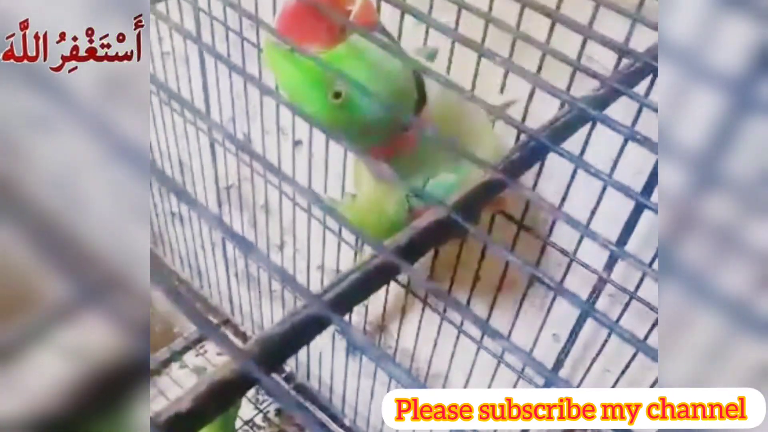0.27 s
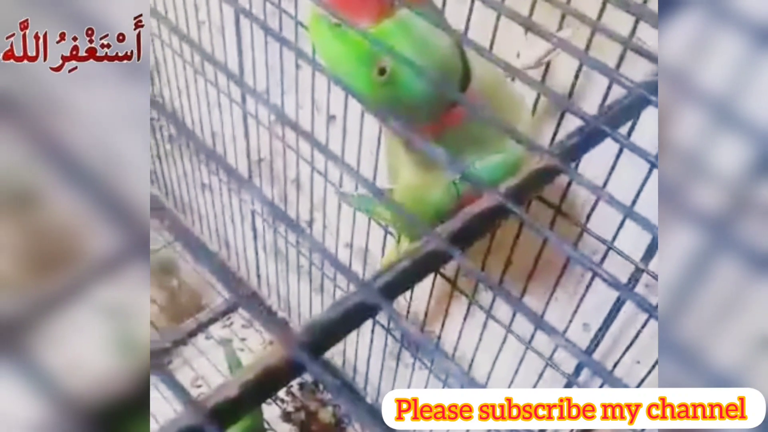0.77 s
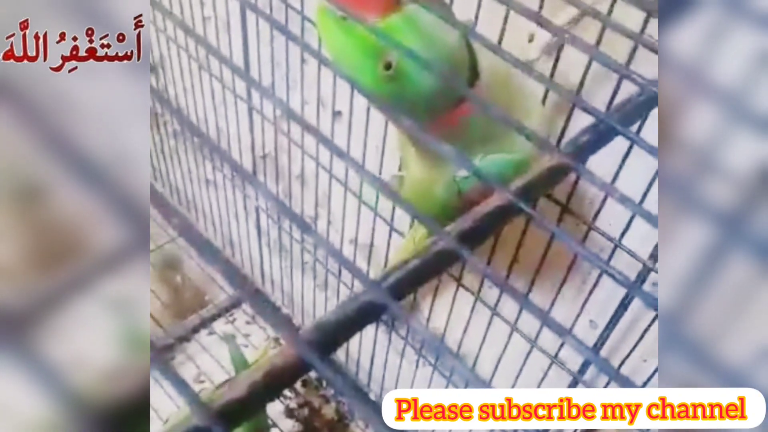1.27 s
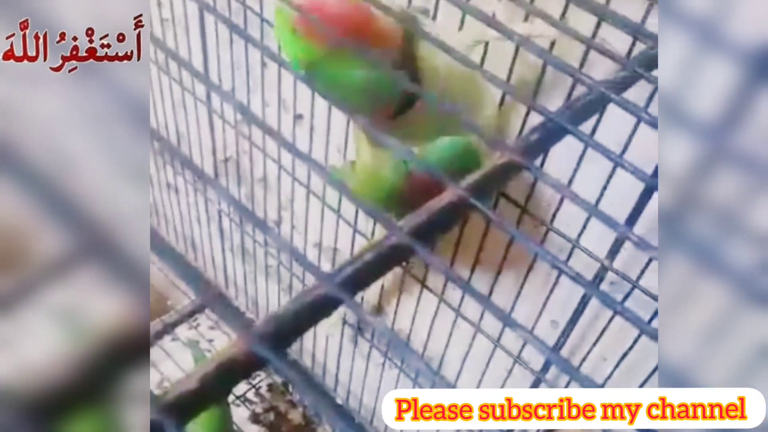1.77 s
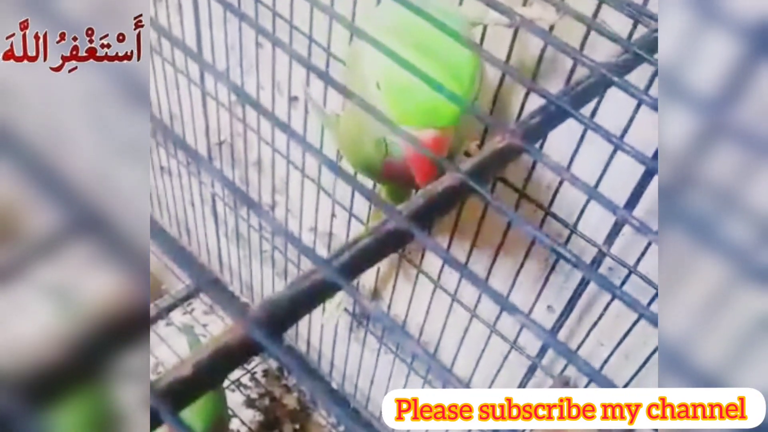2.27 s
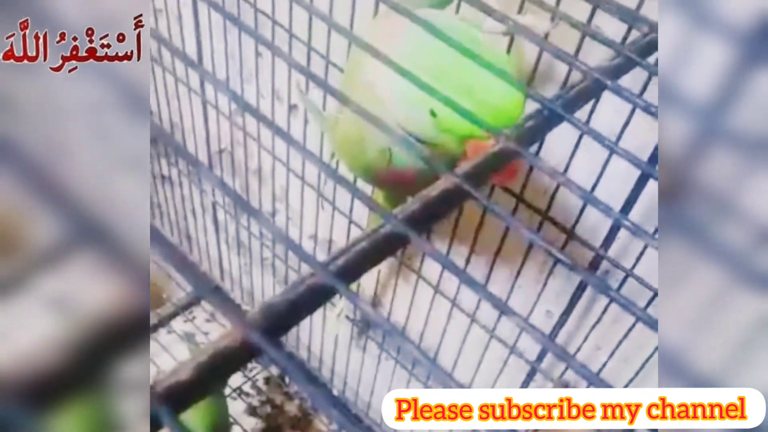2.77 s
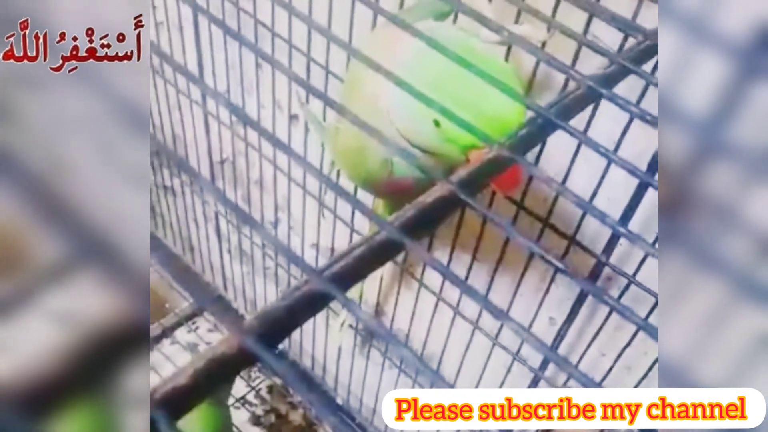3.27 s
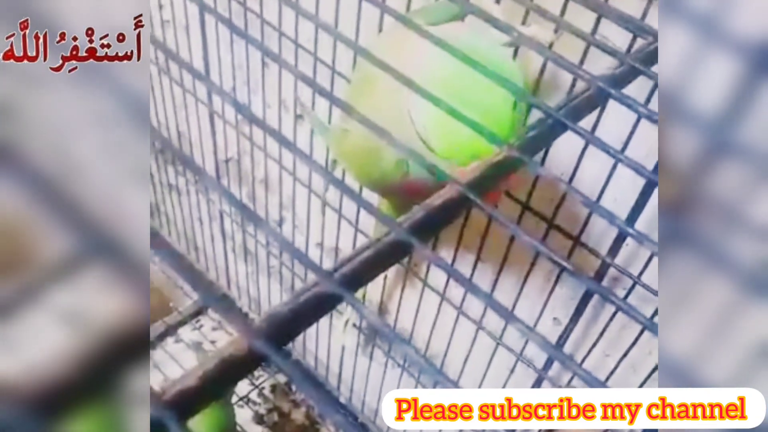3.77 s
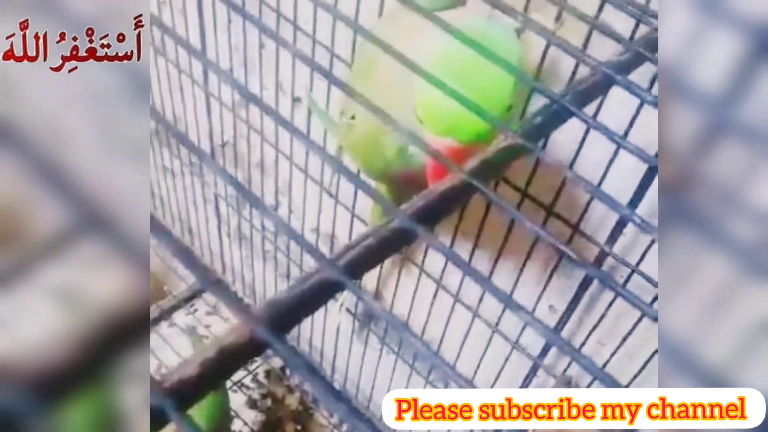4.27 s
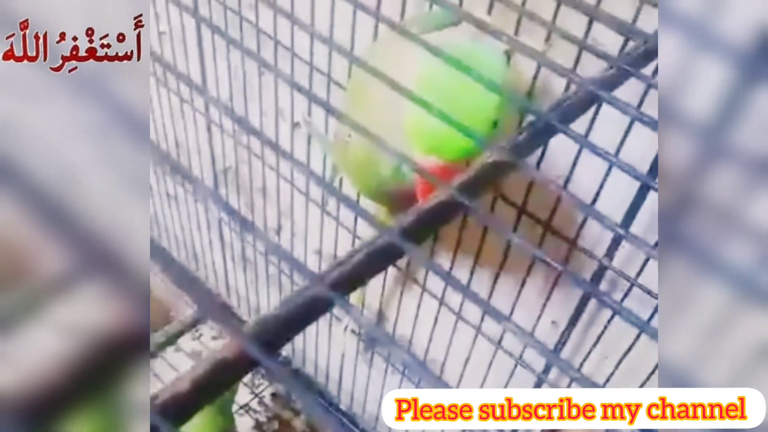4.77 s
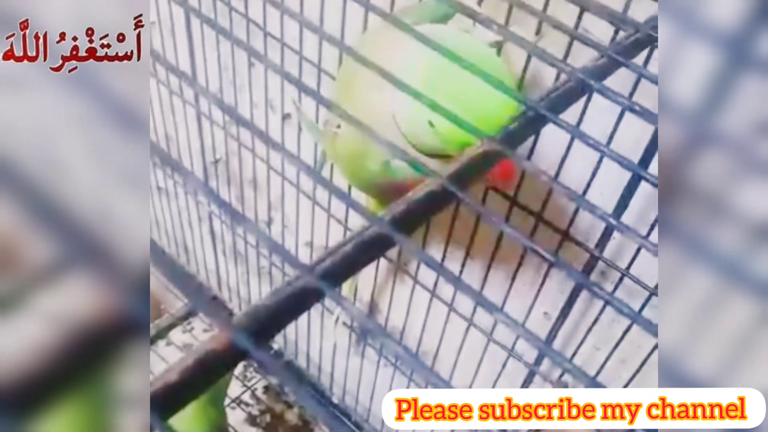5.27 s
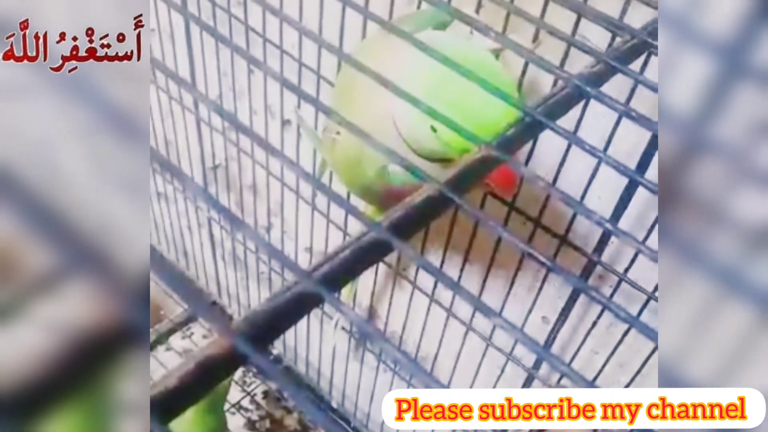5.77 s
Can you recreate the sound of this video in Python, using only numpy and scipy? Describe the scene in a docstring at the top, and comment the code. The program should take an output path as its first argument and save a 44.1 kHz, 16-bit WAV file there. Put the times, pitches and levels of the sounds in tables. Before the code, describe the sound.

In a hard, echoing room with a faint machine hum, a caged parakeet is heard close up in stereo. Quiet gritty chirps, sharp clicks and feathers brushing wire lead to a high falling whistle and a short-long pair of buzzy squawks, while something calls hoarsely farther off. After a pause come three piercing, nearly pure whistles with a wing shake, then more chirps and another squawk pair.

```python
"""A parakeet in a wire cage, close to a phone's two microphones in a hard, echoing room.
Soft chips lead up to arched whistles, nearly pure tones, and to two pairs of rasping squawks,
pulses ringing in its throat. Its feathers scrape the cage, a wing stirs the air, and a few sharp
dry clicks sound close by. A hoarse call comes from farther off, over a low machine hum.
The phone's gain control ducks the room under each loud note."""
import sys
import numpy as np
from scipy import signal
from scipy.fft import rfft, irfft, next_fast_len
from scipy.io import wavfile
from scipy.ndimage import uniform_filter1d, minimum_filter1d, map_coordinates

SR = 44100
rng = np.random.default_rng(int(sys.argv[2]) if len(sys.argv) > 2 else 0)


def file_out(sig):
    """Save sig as 16-bit WAV at sys.argv[1]."""
    # one column per channel
    cols = np.atleast_2d(sig).T
    # limit, then scale
    lim = np.clip(cols, -1, 1)
    pcm = np.round(lim * 32767).astype(np.int16)
    wavfile.write(sys.argv[1], SR, pcm)


N = 265878
TOP_HZ = 13200  # upper limit of the phone's band


def amp(db):
    """Decibels to gain."""
    return 10 ** (np.asarray(db) / 20)


def unit(x):
    """Scale to rms 1."""
    return x / np.sqrt(np.mean(x ** 2) + 1e-20)


def along(points, hz):
    """Read (f/Hz, value) points on a log frequency axis."""
    f, v = np.transpose(points)
    return np.interp(np.log(hz + 1), np.log(f), v)


def wobble(rate, size):
    """A smooth random curve, rate knots a second."""
    knots = rng.standard_normal(int(size * rate / SR) + 4)
    return map_coordinates(knots, [np.arange(size) * rate / SR])


def filtered(x, response):
    """Filter x by a function of frequency."""
    size = x.shape[-1]
    m = next_fast_len(size + 8192)
    return irfft(rfft(x, m) * response(np.fft.rfftfreq(m, 1 / SR)), m)[..., :size]


def noise(colour, size):
    """Noise of rms 1 with a (f/Hz, level/dB) spectrum."""
    return unit(filtered(rng.standard_normal(size), lambda hz: amp(along(colour, hz))))


def ringing(x, colour):
    """x through a (f/Hz, level/dB) body that rings only after it is struck: minimum phase."""
    m = next_fast_len(len(x) + 2048)
    cepstrum = irfft(np.log(amp(along(colour, np.fft.rfftfreq(m, 1 / SR)))), m)
    cepstrum[1:m // 2] *= 2
    cepstrum[m // 2 + 1:] = 0
    return irfft(rfft(x, m) * np.exp(rfft(cepstrum)), m)[:len(x)]


def gesture(points, glide_s):
    """Start time and a curve through (t/s, value) points, its corners rounded."""
    times, values = np.transpose(points)
    curve = np.interp(np.arange(times[0], times[-1], 1 / SR), times, values)
    size = int(glide_s * SR)
    padded = np.pad(curve, size, "reflect", reflect_type="odd")
    return times[0], uniform_filter1d(padded, size)[size:-size]


def add(track, s, sound):
    """Mix a sound into the track at time s."""
    start = max(0, round(s * SR))
    track[start:start + len(sound)] += sound[:N - start]


def faded(x, edge_s):
    """Soften both ends."""
    return x * signal.windows.tukey(len(x), min(1, 2 * edge_s * SR / len(x)))


def phase_of(hz):
    """Running phase of a moving frequency."""
    return 2 * np.pi * np.cumsum(hz) / SR


def from_top(t, rise, fall):
    """Distance from the top of an arch: 1 at its start, 0 at the top, 1 at its end."""
    return np.clip(np.maximum((rise - t) / rise, (t - rise) / fall), 0, 1)


# room tone all around the phone: f/Hz, relative level/dB
ROOM_TONE = [(15, -41.5), (25, -9.5), (86, -7), (170, -18), (433, -22.5), (1110, -30.5), (9000, -40),
             (13000, -51.5)]
# its likeness at the two microphones: f/Hz, correlation
MIC_LIKENESS = [(60, 0.96), (150, 1), (400, 0.13), (1500, 0.045)]


def room_tone(level_db=-56):
    """The room's own noise: alike at both microphones in the bass, wide in the treble."""
    def mid_side_gains(hz):
        """Share the power between mid and side to set the correlation."""
        angle = np.arccos(along(MIC_LIKENESS, hz)) / 2
        return np.array([np.cos(angle), np.sin(angle)])
    mid, side = filtered(np.array([noise(ROOM_TONE, N), noise(ROOM_TONE, N)]), mid_side_gains)
    return amp(level_db) * np.array([mid + side, mid - side])


# partials of a machine in the background: f/Hz, level/dB before the swell
HUM_PARTIALS = [(73.5, -58.5), (96.9, -63.5), (145.3, -67.5), (193.8, -72)]
# its early swell: t/s, gain/dB
HUM_SWELL = [(0, 1), (1.3, 2), (1.7, -1.5)]


def machine_hum(waver_db=0.48, waver_hz=2.4):
    """A low, unsteady hum, the same at both microphones."""
    hum = np.zeros(N)
    for hz, db in HUM_PARTIALS:
        gain = amp(db + waver_db * wobble(2.4, N))
        hum += gain * unit(np.sin(phase_of(hz + waver_hz * wobble(19, N))))
    return amp(np.interp(np.arange(N) / SR, *np.transpose(HUM_SWELL))) * hum


# decay of the hard room: f/Hz, t60/s
ROOM_DECAY = [(400, 1), (1000, 1), (2800, 0.76), (6000, 0.65), (12000, 0.39)]
# colour of its echoes: f/Hz, gain/dB
ECHO_COLOUR = [(400, -2.5), (800, -1.5), (1600, -2.5), (2500, -0.5), (5500, -4), (12000, -4)]


def room(x, early_db, tail_db, count=24, build_s=0.035):
    """Early echoes from the floor and near walls, then a long diffuse tail."""
    hz, t, spectrum = signal.stft(rng.standard_normal((2, SR)), SR, nperseg=256)
    decay = amp(-60 * t / along(ROOM_DECAY, hz)[:, None])
    tail = signal.istft(spectrum * decay, SR, nperseg=256)[1]
    tail *= 1 - np.exp(-np.arange(tail.shape[1]) / SR / build_s)
    response = amp(tail_db) * tail / np.linalg.norm(tail[0])
    for channel in response:
        arrivals = (rng.uniform(0.0018, 0.024, count) * SR).astype(int)
        channel[arrivals] += amp(early_db) * rng.choice([-1, 1], count) / np.sqrt(count)
    echoes = signal.fftconvolve(x[None], response, axes=1)[:, :N]
    return filtered(echoes, lambda hz: amp(along(ECHO_COLOUR, hz)))


# husk of the call from farther off: t/s, relative level/dB
HUSK_LEVEL = [(1.6, -59.5), (1.746, -42.5), (1.86, -39.5), (1.956, -52.5), (2.152, -43), (2.42, -37.5),
              (2.555, -40.5)]
# its colour at the phone: f/Hz, relative level/dB
HUSK_COLOUR = [(400, -24), (620, 3), (860, -1), (1100, 12.5), (1350, 6), (1700, 11.5), (2300, 2.5),
               (2700, -3), (4000, -12.5), (7000, -9.5), (13000, -36)]


def hoarse_call(husk_gain_db=4, flutter_db=2, tone_at_s=2.01, tone_s=.52, tone_db=-40.5, swell_db=7):
    """A far, husky cry with one rough, rising tone in it; it arrives differently at each microphone."""
    out = np.zeros((2, N))
    s, db = gesture(HUSK_LEVEL, glide_s=0.029)
    t = np.arange(0, tone_s, 1 / SR)
    progress = t / t[-1]
    hz = 676.6 + 86 * t
    jitter = .012 + .045 * progress
    tone_gain = amp(tone_db + swell_db * (progress - .5))
    for channel in out:
        husk = amp(husk_gain_db + db + flutter_db * wobble(50, len(db))) * noise(HUSK_COLOUR, len(db))
        phase = phase_of(hz * (1 + jitter * wobble(150, len(t))))
        tone = unit(np.sin(phase) * amp(2.5 * wobble(90, len(t))))
        add(channel, s, faded(husk, edge_s=0.0036))
        add(channel, tone_at_s, faded(tone_gain * tone, edge_s=0.016))
    return out


def cage_scatter(x, db, count):
    """The cage bars and floor send back many weak copies within a few milliseconds."""
    response = np.zeros((2, SR // 50))
    for channel in response:
        arrivals = (rng.uniform(.0003, .006, count) * SR).astype(int)
        channel[arrivals] = amp(db) * rng.choice([-1, 1], count) / np.sqrt(count)
    return signal.fftconvolve(x[None], response, axes=1)[:, :N]


# the bird at close range, left microphone over right: f/Hz, level/dB
NEAR_BALANCE = [(1500, -2), (2700, 7.5), (5000, -4), (5600, 0), (6200, 9.5), (7200, -3), (8500, 13),
                (9500, -6), (11200, -24), (13000, -12.5)]
# the left microphone's lead: f/Hz, phase/rad
NEAR_LEAD = [(200, .1), (900, 2.7), (2300, 1.9), (3900, 1.9), (4500, 6.2), (5500, 4.9), (6700, 7.5),
             (7600, 7.26), (9000, 11), (12500, 10.6)]
# left over right as the bird squawks, head down at the rail: f/Hz, level/dB
HEAD_DOWN_BALANCE = [(420, 2), (1600, -5.5), (2400, 5.5), (3100, 0.5), (5800, -3), (8000, 4), (11500, -15)]
# the left microphone's lead from there: f/Hz, phase/rad
HEAD_DOWN_LEAD = [(500, 0.61), (2800, 2.74), (3600, 3.88), (4600, 5.47), (5600, 5.9), (7000, 7.5),
                  (8000, 11)]


def microphones(x, balance, lead):
    """The phone's body shades and delays the direct sound differently for its two microphones."""
    def response(hz):
        """Left and right gain and phase, at constant total power."""
        sides = np.array([[.5], [-.5]])
        shade = amp(sides * along(balance, hz))
        return shade / np.sqrt(np.mean(shade ** 2, axis=0)) * np.exp(1j * sides * along(lead, hz))
    return filtered(x, response)


# a wing shaken near the phone: peak t/s, level/dB, fade/s
WING_FLAPS = [(4.288, -42, .12)]
# the air it moves: f/Hz, relative level/dB
WING_COLOUR = [(60, -36), (140, -0.5), (2200, -8.5), (4000, -48)]


def wing_flap(lumps_db=3, rise_share=0.42):
    """A soft lumpy rush of air from a shaken wing, quicker to grow than to fade."""
    out = np.zeros(N)
    for s, db, fade in WING_FLAPS:
        rise = rise_share * fade
        t = np.arange(-rise, fade, 1 / SR)
        swell = np.cos(np.pi / 2 * t / np.where(t < 0, rise, fade))
        lumps = amp(db + lumps_db * wobble(83, len(t)))
        add(out, s + t[0], swell * lumps * noise(WING_COLOUR, len(t)))
    return out


# feather strokes on the cage: peak t/s, relative level/dB, fade/s, tilt/(dB per octave), wire ring/dB
FEATHER_STROKES = [(0.016, -48, 0.027, -0.5, -6), (0.158, -38, 0.039, 3.5, 7.5),
                   (0.478, -35, 0.035, 1.5, 4.5), (1.038, -41, 0.066, 1, -2), (1.157, -44.5, 0.045, 4, -3),
                   (1.344, -37.5, 0.054, 7.5, 4), (4.232, -22.5, 0.085, 5, -14.5),
                   (4.61, -45.5, 0.081, -1, -6.5), (5.57, -46, 0.075, -0.5, -1.5)]
# feathers before the tilt: f/Hz, relative level/dB
FEATHER_COLOUR = [(240, -36), (400, -8.5), (1790, -1), (2300, -9.5), (5270, -6.5), (13000, -13)]
# resonances of the wires: f/Hz, width/Hz, gain/dB
WIRE_MODES = [(3470, 110, 4.5), (6100, 60, 0), (8900, 810, 0), (11800, 610, -3.5)]


def rustles(attack_s=.014, grain_db=4.5, catch_db=3, brush_gain_db=-3, wire_gain_db=-4):
    """Feathers scrape the cage: each stroke catches quickly, fades in grains and rings the wires."""
    brush, wires = np.zeros(N), np.zeros(N)
    for s, db, fade, tilt_db, ring_db in FEATHER_STROKES:
        t = np.arange(-2 * attack_s, 3 * fade, 1 / SR)
        swell = np.exp(-np.abs(t / np.where(t < 0, attack_s, fade)) ** 1.5)
        friction = noise([(hz, level + tilt_db * np.log2(hz)) for hz, level in FEATHER_COLOUR], len(t))
        grains = amp(grain_db * wobble(900, len(t)) + catch_db * wobble(110, len(t)))
        stroke = amp(db) * swell * unit(friction * grains)
        add(brush, s + t[0], amp(brush_gain_db) * stroke)
        add(wires, s + t[0], amp(wire_gain_db + ring_db) * stroke)
    return brush + filtered(wires, lambda f: sum(
        amp(db) * 1j * f * width / (hz ** 2 - f ** 2 + 1j * f * width) for hz, width, db in WIRE_MODES))


# sharp dry clicks close by, one snapping at the start of a whistle: t/s, relative level/dB
DRY_CLICKS = [(0.11, -36), (0.6858, -30.5), (1.481, -33.5), (3.902, -27), (5.0863, -30)]
# their colour: f/Hz, relative level/dB
CLICK_COLOUR = [(240, -63), (600, -15), (6010, -13), (13000, -21)]


def clicks(snap_t60=0.0057, tail_t60=.05, tail_db=-14, gain_db=2):
    """Sharp dry clicks: each a snap of broad noise with a faint, short tail."""
    out = np.zeros(N)
    t = np.arange(SR // 10) / SR
    decay = amp(-60 * t / snap_t60) + amp(tail_db - 60 * t / tail_t60)
    for s, db in DRY_CLICKS:
        add(out, s, amp(db + gain_db) * decay * noise(CLICK_COLOUR, len(t)))
    return out


# soft chips close to the phone: centre t/s, relative level/dB, main resonance f/Hz
SOFT_CHIPS = [(0.393, -28.5, 4080), (.496, -31, 3950), (1.506, -27, 4100), (1.593, -27, 3900),
              (1.689, -25.5, 3815), (1.806, -26.5, 4090), (2.527, -26.5, 4110), (3.769, -29.5, 4200),
              (3.867, -25, 4180), (4.961, -28.5, 4050), (5.059, -27.5, 4003)]
# the rasp in a chip: f/Hz, relative level/dB
RASP_COLOUR = [(700, -24), (1400, 0.5), (1900, 17.5), (2600, -14), (3300, 8), (4200, 3.5), (5000, -10),
               (6000, 0.5), (8200, 0.5), (13000, -26.5)]
# the beak in a chip: multiple of the main resonance, relative level/dB
BEAK_MODES = [(.5, -7.5), (.88, -7), (1, 2.5), (1.5, -17), (2, -12)]


def chips(rasp_db=-15, burst_db=-2, scatter_db=3, burst_t60=.012, count=30, drop=.09, drop_s=.016):
    """Short gritty chatters: a falling note voiced in an uneven run of tiny sharp bursts."""
    out = np.zeros(N)
    t = np.arange(-.04, .05, 1 / SR)
    for s, db, hz in SOFT_CHIPS:
        rasp = amp(rasp_db) * noise(RASP_COLOUR, len(t)) * np.exp(-np.abs(t) / .05)
        onsets = t[0] + .09 * (np.arange(count) + rng.uniform(0, 1, count))[:, None] / count
        age = np.maximum(t - onsets, 0)
        # bursts are strongest at the centre of the chip
        sizes = amp(scatter_db * rng.standard_normal(onsets.shape)) * np.exp(-np.abs(onsets) / .0084)
        bursts = ((age > 0) * sizes * amp(-60 * age / burst_t60)).sum(0)
        phase = phase_of(hz * (1 - drop * np.tanh(t / drop_s)))
        note = sum(amp(burst_db + mode_db) * np.sin(ratio * phase) for ratio, mode_db in BEAK_MODES)
        add(out, s + t[0], amp(db) * faded(rasp + bursts * note, edge_s=.012))
    return out


# squawks at the rail, the short ones breaking off near the top: t/s, length/s, rise/s,
# top pulse rate f/Hz, top level/dB, flatness of the rise, least roughness 0-1, throat pitch ratio
RAIL_SQUAWKS = [(2.548, 0.079, 0.086, 560.6, -10.5, 1.56, 0.53, .99),
                (2.708, 0.19, .09, 792, -9, 2.1, 0.06, 0.964),
                (5.128, 0.078, .07, 583, -9.5, 1.15, 0.5, 1.03),
                (5.29, 0.18, 0.088, 804.3, -9, 2.65, 0, 1.004)]
# throat and open beak: f/Hz, relative gain/dB
SQUAWK_THROAT = [(200, -43), (360, -10), (550, -14), (800, -19), (1100, -9.5), (1570, -6), (2050, -4.5),
                 (2400, -7), (2750, -17.5), (3150, -9.5), (3550, -10.5), (4000, -10), (4900, -8.5),
                 (5600, -1.5), (6300, -4.5), (6800, -12), (7200, -13.5), (8800, -17), (10000, -26.5),
                 (11200, -26.5), (13000, -40.5)]


def squawks(slack_hz=333.5, slack_db=-13.5, attack_s=.024, fall_s=.09, locked=0.93, ragged=0.83):
    """Pulses through the throat: one push of effort raises rate and level, from a rattle to a buzz."""
    out = np.zeros(N)
    breath_colour = [(600, -8.5), (2000, 1.5), (3000, -6), (5800, 1.5), (9000, -0.5)]  # f/Hz, level/dB
    for s, length, rise, top_hz, top_db, flatness, least_rough, stretch in RAIL_SQUAWKS:
        t = np.arange(0, length, 1 / SR)
        size = len(t)
        effort = np.cos(np.pi / 2 * from_top(t, rise, fall_s) ** np.where(t < rise, flatness, 1.9)) ** 2
        hz = slack_hz + (top_hz - slack_hz) * effort
        db = top_db + slack_db * (1 - effort) ** 0.96
        # the membranes lock into step as the rate nears the top of the call
        rough = np.clip((locked - hz / top_hz) / (locked - ragged), least_rough, 1)
        jitter, rasp, shimmer_db = .006 + .022 * rough, 1.2 * rough, 1.6 * rough
        phase = phase_of(hz * (1 + jitter * wobble(600, size)))
        pulses = unit(sum((k * hz < TOP_HZ) * amp(2 * wobble(60, size)) * np.cos(k * phase)
                          for k in range(1, 38)))
        # turbulent air escapes once a cycle, mostly in the treble
        puffs = unit(noise(breath_colour, size) * (1 + 0.47 * np.cos(phase)))
        source = (pulses + (.04 + rasp) * puffs) / np.hypot(1, rasp)
        source *= amp(shimmer_db * wobble(500, size))
        throat = [(f * stretch, level) for f, level in SQUAWK_THROAT]
        voice = amp(db) * unit(ringing(source, throat))
        add(out, s, faded(voice * np.minimum(t / attack_s, 1), edge_s=0.0091))
    return out


# whistles close to the phone, the first only a faint peep; levels are before throat and beak:
# t/s, rise/s, fall/s, start f/Hz, top f/Hz, end f/Hz, level/dB, swell/dB, second partial level/dB,
# its fade/dB, upper partials level/dB, attack/s, release/s, arch power (2 = parabola)
WHISTLE_NOTES = [(0, 0.0037, 0.1, 6050, 5920, 5850, -51.5, -14, -65, 27, -45, 0.0036, .022, 1.4),
                 (1.863, 0.035, 0.15, 2553, 2515, 1967, -6, 17.5, -22.5, -9.5, -13, 0.0038, .065, 2.4),
                 (3.902, 0.043, 0.085, 2553, 3077, 2390, -3.5, 3.5, -10.5, 14, -8.5, 0.0024, .024, 1.9),
                 (4.081, .075, .073, 2410, 3002, 2417, -1, 2.5, -13, 3, -10, 0.012, .024, 1.85),
                 (4.286, 0.069, .081, 2360, 2859, 2284, -1.5, 3.5, -13.5, 3.5, -7.5, 0.015, .026, 1.95)]
# the throat favours mid-range notes and the band the second partial sweeps: f/Hz, gain/dB
THROAT_GAIN = [(2000, -9.5), (2300, -6), (2470, -2), (2750, -4.5), (2930, -4), (3080, -5.5), (4700, -7.5),
               (5000, -5.5), (5350, -5), (5700, -1.5)]
# the beak favours two bands of high overtones: f/Hz, gain/dB
BEAK_GAIN = [(6800, -30), (8700, -16), (10300, -31), (12200, -19.5), (13200, -30.5)]


def whistles(waver=0.00044, flicker_db=3, release_db=6.5, follow=0.98):
    """Nearly pure arched notes through the throat; returns the tones and their flickering overtones."""
    tones, overtones = np.zeros((2, N))
    for (s, rise, fall, start_hz, top_hz, end_hz, db, swell_db,
         overtone_db, fade_db, upper_db, attack, release, arch) in WHISTLE_NOTES:
        t = np.arange(0, rise + fall, 1 / SR)
        progress = t / (rise + fall) - .5
        sag_hz = (top_hz - np.where(t < rise, start_hz, end_hz)) * from_top(t, rise, fall) ** arch
        hz = top_hz - sag_hz
        first_db = db + swell_db * progress + along(THROAT_GAIN, hz)
        second_db = overtone_db - fade_db * progress + along(THROAT_GAIN, 2 * hz)
        phase = phase_of(hz * (1 + waver * wobble(210, len(t))))
        upper = np.zeros(len(t))
        for k in (3, 4, 5):
            beak_db = along(BEAK_GAIN, k * hz) + flicker_db * wobble(70, len(t))
            upper += amp(beak_db) * np.sin(k * phase) * (k * hz < TOP_HZ)
        dying = np.clip(1 - (t[-1] - t) / release, 0, 1)
        drive = np.minimum(t / attack, 1) * amp(-release_db * dying)
        # overtones need a strong drive: they come in later and leave earlier
        tone = amp(first_db) * np.sin(phase) + drive * amp(second_db) * np.sin(2 * phase)
        upper *= np.sqrt(drive) * amp(upper_db + swell_db * progress + follow * (second_db - overtone_db))
        add(tones, s, faded(np.sqrt(2) * drive * tone, edge_s=0.003))
        add(overtones, s, faded(np.sqrt(2) * drive * upper, edge_s=0.003))
    return tones, overtones


def scene():
    """The bird close to the microphones, the room answering, the far call and the hum behind."""
    whistle, overtones = whistles()
    squawk, chip = squawks(), chips()
    movement, click = rustles() + wing_flap(), clicks()
    echoes = room(whistle, early_db=-11, tail_db=-16.5, count=8)
    echoes += room(overtones, early_db=-7.5, tail_db=-12.5)
    echoes += room(squawk, early_db=-12.5, tail_db=-14)
    echoes += room(chip, early_db=-0.5, tail_db=-5)
    echoes += room(movement, early_db=4, tail_db=-1)
    echoes += room(click, early_db=4.5, tail_db=-1.5)
    bars = cage_scatter(overtones + click, db=-5, count=10)
    squawk = squawk + cage_scatter(squawk, db=-9, count=16)[0]
    near = microphones(whistle + overtones + chip + movement + click, NEAR_BALANCE, NEAR_LEAD)
    near += microphones(squawk, HEAD_DOWN_BALANCE, HEAD_DOWN_LEAD)
    return near + bars + echoes + hoarse_call() + machine_hum() + room_tone()


def record(dry, threshold_db=-22, squeeze=0.29, window_s=0.0044, hold_s=0.0023, ceiling=.92):
    """The phone's gain control turns everything down when loud; peaks round off and the top is cut."""
    power = uniform_filter1d(np.mean(dry ** 2, axis=0), int(window_s * SR))
    level_db = 10 * np.log10(np.abs(power) + 1e-12)
    cut_db = -squeeze * np.maximum(level_db - threshold_db, 0)
    hold = int(hold_s * SR)
    ducked = dry * amp(uniform_filter1d(minimum_filter1d(cut_db, hold), hold))
    rounded = ducked / (1 + (ducked / ceiling) ** 8) ** (1 / 8)
    return filtered(rounded, lambda hz: hz < TOP_HZ)


dry = scene()
out = record(dry)
file_out(out)
```